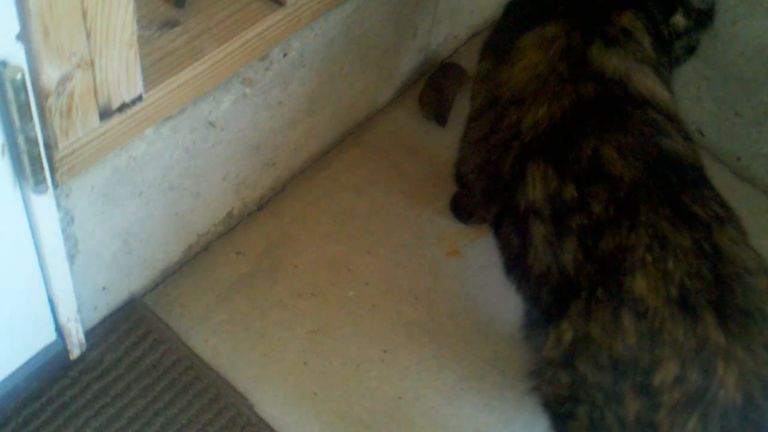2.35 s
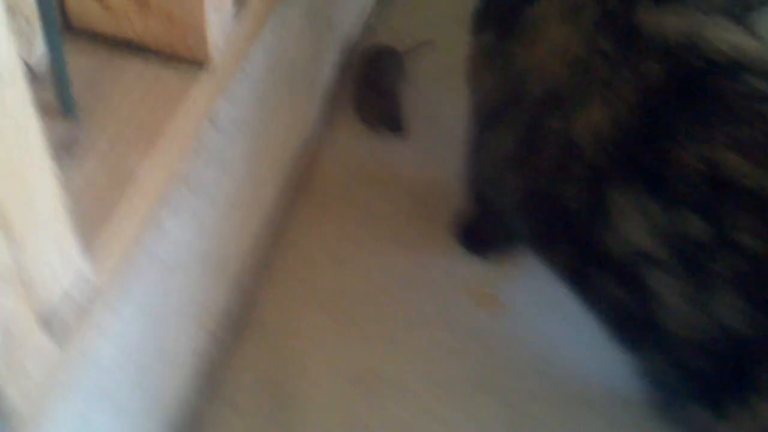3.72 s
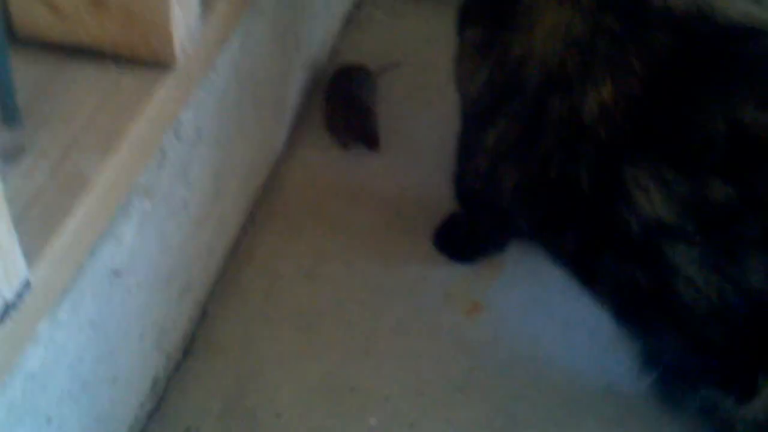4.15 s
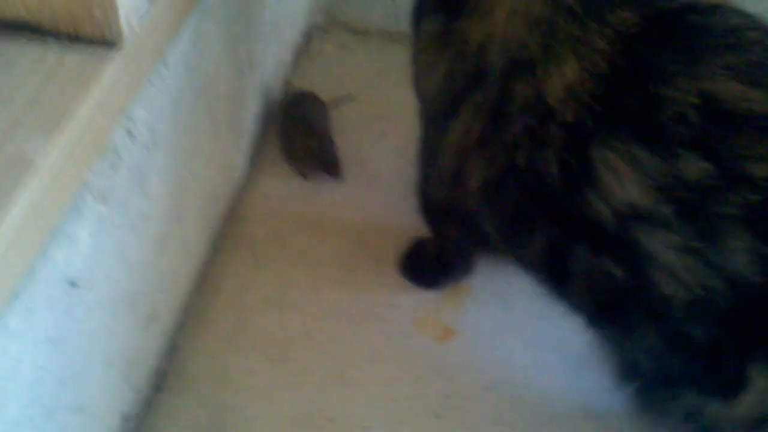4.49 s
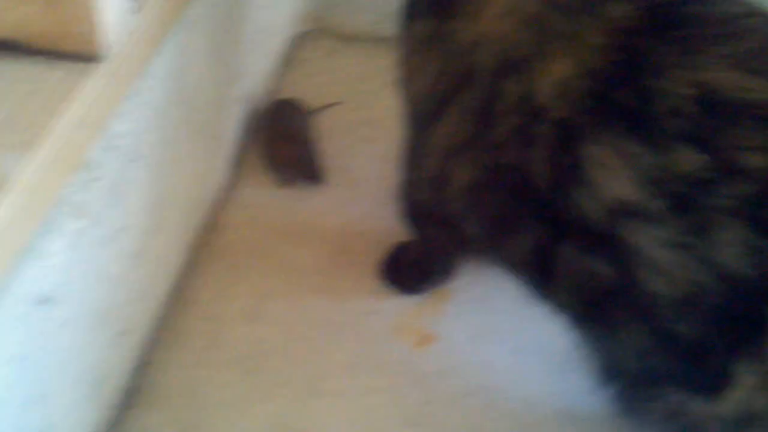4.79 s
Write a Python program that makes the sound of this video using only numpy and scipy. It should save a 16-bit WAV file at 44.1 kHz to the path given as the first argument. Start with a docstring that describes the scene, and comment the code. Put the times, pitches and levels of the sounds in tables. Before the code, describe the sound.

Faint, high, raspy mouse squeaks come about once a second over steady room rumble and machine hum, with some handling noise.

```python
"""A cornered mouse in a garage

A mouse squeaks faintly seven times, half rasp and half whistle, and bare garage walls ring on.
Behind it a machine hums, the room's air rumbles and two microphones hiss. The hand holding the
camera taps its case, a sleeve brushes and ticks, and a small metal piece clinks once.
The camera widens the stereo sound."""
import sys
import numpy as np
from scipy import signal
from scipy.fft import rfft, irfft
from scipy.io import wavfile
from scipy.ndimage import uniform_filter1d

SR = 44100
rng = np.random.default_rng(int(sys.argv[2]) if len(sys.argv) > 2 else 0)


def digitize_waveform(pressure):
    """Quantize a signal to 16-bit integers and store it at the path in sys.argv[1].

    Rows of a 2-D input are taken as channels; values are limited to [-1, 1].
    """
    field = np.atleast_2d(pressure).T
    bounded = np.clip(field, -1, 1)
    quanta = np.round(bounded * 32767).astype(np.int16)
    wavfile.write(sys.argv[1], SR, quanta)


N = 307244
TIME = np.arange(N) / SR

# Room air and microphone hiss. Each row: frequency in Hz, level in dB of the part that is alike in
# both microphones, level in dB of the part that is opposite in them.
AIR_SPECTRUM = [(31.6, -60, -42.5), (64, -43, -52), (99, -36.5, -40.5), (180, -31, -44.5),
                (249, -33.5, -44.5), (494, -41.5, -49), (606, -49, -52.5), (798, -48.5, -55),
                (1550, -61, -57), (2260, -66, -64.5), (3300, -68.5, -69), (5750, -72, -73),
                (7900, -67.5, -70), (13500, -68, -70.5)]
# The machine's hum, louder as the camera nears the corner. Each row: time in seconds, level in dB.
HUM_LEVELS = [(0, -70), (.85, -56), (1.08, -51.5), (3.5, -50), (4.25, -47), (5.6, -48.5), (6.97, -48.5)]
# Its weaker, higher whine. Each row: time in seconds, level in dB.
WHINE_LEVELS = [(0, -85.5), (3, -69), (4, -68), (4.6, -73), (6.97, -75)]
# Sleeve strokes. Each row: start in seconds, length in seconds, hiss level in dB, scrape level in dB,
# swell (small is abrupt, large is gradual), hiss brightness in dB per octave, scrape pitch factor.
SLEEVE_STROKES = [(0.584, 0.24, -62.5, -62, 0.35, -1.5, 1.2), (.68, 0.076, -56.5, -65, .7, 7, 3.1),
                  (0.94, 0.062, -59, -61.5, 0.78, -5, 1.3), (1.14, 0.13, -59.5, -63, 0.64, 0, 1.3),
                  (1.36, 0.1, -59.5, -59.5, 0.88, -3, 0.93), (1.42, .1, -56, -64, 0.94, -.5, 1.1),
                  (1.651, 0.038, -57, -65, .5, 4, 1.1), (1.659, 0.36, -69, -61.5, 0.81, 0, 0.82),
                  (2.48, 0.24, -68.5, -61.5, 0.84, -3, 0.54), (2.84, 0.17, -61, -60.5, 0.66, -3, 1.6),
                  (2.989, 0.17, -67.5, -64.5, 0.51, -6, 1.4), (3.355, 0.14, -69, -58.5, 1.1, -7, 0.72),
                  (3.52, 0.5, -67, -61.5, 0.68, -2.5, .9), (3.718, 0.032, -63, -55, 0.32, -2, 1.3),
                  (3.87, 0.99, -62, -68, 0.37, -2, 1.5), (4.198, 0.072, -51.5, -56, 0.32, 1, 1.2),
                  (4.485, 0.035, -46, -56, 0.59, 2.5, 1.56), (4.381, 0.99, -70, -68, 1.1, 1, .8)]
# The hiss of the cloth fibres. Each row: frequency in Hz, level in dB.
FIBRE_SPECTRUM = [(1000, -35), (2400, -22), (3500, -5), (4800, -4), (7000, 1), (9000, 2), (11500, 2.5),
                  (14000, -1)]
# Cloth scraping on the case. Each row: frequency in Hz, level in dB.
SCRAPE_SPECTRUM = [(300, 6.5), (850, 3), (1200, 3.5), (1700, -0.5), (2300, -4.5), (3400, -8), (5000, -10.5),
                   (10000, -20)]
# Finger taps beside the right microphone. Each row: start in seconds, peak level in dB,
# pitch factor of the spot that is hit, ring time factor.
FINGER_TAPS = [(.004, -4.5, 1.043, 1.56), (0.657, -40, 0.9, 5.5), (3.136, -38.5, 0.92, 0.84),
               (3.31, -44, 1.3, 1), (3.614, -33.5, 0.72, 0.7), (3.728, -44, 1.4, 2),
               (3.738, -38.5, 1.55, 1.6), (4.276, -41, 0.29, 2.2), (4.4888, -37, 0.49, 2.34),
               (5.097, -40.5, 1.15, 1.2), (5.0989, -36.5, 0.53, 0.98), (5.2954, -45, 1.2, 0.88),
               (5.2965, -35.5, 0.34, 2.5)]
# The case's own tones, before each tap scales them. Each row: frequency in Hz, level in dB,
# ring time in seconds. A ring time is how long a sound takes to fade by 60 dB.
CASE_TONES = [(953, -0.5, 0.0052), (630, 3.5, 0.003), (307, -7.5, 0.0071)]
# Dry ticks. Each row: start in seconds, peak level in dB, brightness in dB per octave,
# ring time in seconds, pitch factor.
DRY_TICKS = [(.598, -45.5, -15, 0.0085, 0.85), (1.649, -33.5, -1.5, 0.0097, 1.2), (3.93, -37, -6, .014, 1),
             (3.9395, -38.5, -5, 0.03, 1.1), (3.962, -44, -5, 0.017, 1.04), (4.279, -42, -6.5, 0.023, 1.4),
             (6.355, -52, -13, .015, 0.89)]
# The tone colour that the ticks share. Each row: frequency in Hz, level in dB.
TICK_SPECTRUM = [(500, -30), (1500, -20), (2300, 3.5), (3000, 3), (4200, -6), (7000, 8), (10000, 8.5),
                 (14000, 10)]
# The metal piece's tones. Each row: frequency in Hz, level in dB, ring time in seconds.
METAL_TONES = [(7600, -54, 0.15), (12920, -55, .09)]
# The garage's echo. Each row: frequency in Hz, ring time in seconds.
GARAGE_RING_TIMES = [(2500, 0.75), (5000, 0.56)]
# Clear notes within the squeaks, at times two at once. Each row: start in seconds, length in seconds,
# level in dB, middle pitch in Hz, pitch glide in Hz.
WHISTLE_NOTES = [(.09, .055, -65, 3770, 120), (.095, 0.099, -68, 4230, 0), (.133, .04, -68, 2960, 0),
                 (.138, .032, -63, 3430, 78), (1.042, .038, -59.5, 4110, 140), (1.059, .036, -56, 4490, 0),
                 (1.092, 0.1, -67, 3040, 0), (1.803, 0.058, -63.5, 3920, -120),
                 (1.853, .047, -64, 3240, 30), (1.908, .05, -65, 3190, -30), (2.807, 0.042, -68, 3530, 130),
                 (3.985, .023, -69, 4060, 50), (4.017, 0.036, -66, 3570, 2),
                 (5.113, .074, -73.5, 3600, -58), (5.79, .025, -65, 3590, 100),
                 (5.846, .048, -67.5, 3290, 80)]
# Breath shaped by the mouse's mouth. Each row: frequency in Hz, level in dB.
BREATH_SPECTRUM = [(1500, -40), (2600, -25), (3100, -1), (3700, 2), (4500, 1), (5000, -8), (8000, -36)]
# The hoarse squeaks. Each row: start in seconds, length in seconds, level in dB, top pitch in Hz,
# final pitch in Hz, rasp as a share of the pitch, share of the length at which the voice breaks
# downward, level of the final note in dB compared with the first.
HOARSE_SQUEAKS = [(0.072, 0.12, -66, 3800, 3490, 0.066, 0.57, -2),
                  (1.015, .15, -60.5, 4166, 3150, 0.075, 0.53, -9),
                  (1.779, 0.18, -60.5, 3990, 3150, 0.095, 0.7, -7),
                  (2.758, 0.11, -66, 3680, 3520, 0.076, 0.86, -3.5),
                  (3.963, 0.1045, -64.5, 3700, 3460, 0.078, 0.545, -3),
                  (5.095, 0.1, -70.5, 3670, 3560, .08, 0.72, 2),
                  (5.735, .175, -66.5, 3960, 3235, .135, 0.47, -3)]
# Stereo widening. Each row: frequency in Hz, share of the other channel that is subtracted.
WIDENING_SHARES = [(100, 0.77), (2400, 1), (2850, 1), (3900, 0.63), (5200, 0.35), (8000, 0.25),
                   (13000, 0.35)]


def amp(db):
    """Turns decibels into a factor to multiply by."""
    return 10 ** (np.asarray(db) / 20)


def unit(x):
    """Scales a signal to an average size (rms) of one."""
    return x / np.sqrt(np.mean(x ** 2) + 1e-20)


def read(points, hz, column=1):
    """Looks up frequencies in a table, blending between rows on a logarithmic frequency scale."""
    table = np.transpose(points)
    return np.interp(np.log(hz + 1), np.log(table[0] + 1), table[column])


def add(mix, start_s, sound):
    """Adds a sound to the mix at the given time."""
    part = mix[..., max(round(start_s * SR), 0):][..., :sound.shape[-1]]
    part += sound[..., :part.shape[-1]]


def noise(points, column=1, size=N, pitch=1):
    """Noise coloured by a spectrum table, which the pitch factor shifts up or down."""
    gain = amp(read(points, np.fft.rfftfreq(size, 1 / SR) / pitch, column))
    return irfft(rfft(rng.standard_normal(size)) * gain, size)


def wander(hz):
    """A random drift of average size one, mostly slower than the given rate."""
    keep_slow = 1 / (1 + (np.fft.rfftfreq(N, 1 / SR) / hz) ** 4)
    return unit(irfft(rfft(rng.standard_normal(N)) * keep_slow, N))


def tilted(points, db_per_octave):
    """Makes a spectrum table brighter or duller."""
    return [(hz, level + db_per_octave * np.log2(hz)) for hz, level in points]


def mottled(x, patch_db):
    """Keeps shifting a sound's colour with random patches about 1 kHz wide and 25 ms long."""
    spectra = signal.stft(x, nperseg=256)[2]
    specks = rng.standard_normal(spectra.shape[-2:])
    patches = uniform_filter1d(uniform_filter1d(specks, size=6, axis=0), size=8, axis=1)
    return signal.istft(spectra * amp(patch_db * unit(patches)), nperseg=256)[1][..., :N]


def air(swell_db=0.65, bass_hz=130, bass_db_per_hum_db=0.2):
    """The room rumbles and the microphones hiss; the bass builds with the hum toward the corner."""
    alike, opposite = noise(AIR_SPECTRUM, column=1), noise(AIR_SPECTRUM, column=2)
    pair = np.array([alike + opposite, alike - opposite]) * amp(swell_db * wander(hz=9.8))
    bass = signal.sosfiltfilt(signal.butter(3, bass_hz, fs=SR, output="sos"), pair)
    hum_db = np.interp(TIME, *np.transpose(HUM_LEVELS))
    bass_gain = amp(bass_db_per_hum_db * (hum_db - hum_db.mean()))
    return pair + bass * (bass_gain - 1)


def machine(hum_hz=197.2, whine_hz=582, waver_db=1.0, drift=0.0026, lag_radians=0.022):
    """A machine gives off two wavering tones that reach the microphones slightly out of step."""
    out = np.zeros((2, N))
    for hz, levels in ((hum_hz, HUM_LEVELS), (whine_hz, WHINE_LEVELS)):
        phase = 2 * np.pi * np.cumsum(hz * (1 + drift * wander(hz=3.6))) / SR
        loudness = amp(np.interp(TIME, *np.transpose(levels)) + waver_db * wander(hz=4.4))
        out += loudness * np.sqrt(2) * np.sin([phase, phase - lag_radians])
    return out


def sleeve(hardest_at=0.41, grain_db=0.6, grain_hz=400, drag_db=1.14, drag_hz=45):
    """Cloth rubs the case: each fold has its own colour, and catching fibres make it grainy."""
    out, t = np.zeros((2, N)), np.arange(SR) / SR
    for start, length, hiss_db, scrape_db, swell, brightness, pitch in SLEEVE_STROKES:
        pressure = np.interp(t / length, [0, hardest_at, 1], [0, 1, 0]) ** swell
        for channel in out:
            hiss = unit(noise(tilted(FIBRE_SPECTRUM, brightness), size=SR))
            scrape = unit(noise(SCRAPE_SPECTRUM, size=SR, pitch=pitch))
            add(channel, start, pressure * (amp(hiss_db) * hiss + amp(scrape_db) * scrape))
    rubbing = mottled(out, patch_db=1.5)
    catching_db = grain_db * wander(grain_hz) + drag_db * wander(drag_hz)
    return rubbing * unit(amp(catching_db))


def taps(contact_s=0.00093, left_db=-22, low_cut_hz=110):
    """A soft fingertip makes the case ring: higher on a stiff spot, longer where the hand damps less."""
    t, out = np.arange(SR // 20) / SR, np.zeros(N)
    low_cut = signal.butter(1, low_cut_hz, "high", fs=SR)  # the microphone's opening leaks slow pressure
    for start, peak_db, pitch, ring_factor in FINGER_TAPS:
        ring = sum(amp(db - 60 * t / (ring_s * ring_factor)) * np.cos(2 * np.pi * hz * pitch * t)
                   for hz, db, ring_s in CASE_TONES)
        push = np.sin(np.pi * np.minimum(t * pitch / contact_s, 1)) ** 2  # shorter on a stiff spot
        knock = signal.lfilter(*low_cut, signal.fftconvolve(ring, push)[:len(t)])
        add(out, start, amp(peak_db) * knock / abs(knock).max())
    return out * amp([[left_db], [0]])


def ticks():
    """Cloth and case give tiny snaps, each a short burst of noise with its own colour."""
    t, out = np.arange(2048) / SR, np.zeros((2, N))
    for start, peak_db, brightness, ring_s, pitch in DRY_TICKS:
        colour = tilted(TICK_SPECTRUM, brightness)
        burst = np.array([noise(colour, size=len(t), pitch=pitch) for channel in out])
        burst *= amp(-60 * t / ring_s)
        add(out, start, amp(peak_db) * burst / abs(burst).max())
    return out


def clink(start_s=1.667, right_db=-4):
    """A small piece of metal rings briefly with two high tones."""
    t, out = np.arange(SR // 3) / SR, np.zeros((2, N))
    sides = np.array([[1], [-amp(right_db)]])  # the right wave is weaker and upside down
    for hz, db, ring_s in METAL_TONES:
        add(out, start_s, amp(db - 60 * t / ring_s) * np.sin(2 * np.pi * hz * t) * sides)
    return out


def garage(sound, direct_db=-6.5, echo_db=-6, early_db=6, early_s=0.039):
    """The corner throws back a dense bunch of early echoes, then the bare walls ring on."""
    hz, t, spectra = signal.stft(rng.standard_normal((2, SR // 2)), SR, nperseg=256)
    decay = amp(-60 * t / read(GARAGE_RING_TIMES, hz)[:, None] + early_db * np.exp(-t / early_s))
    tail = signal.istft(spectra * decay, SR, nperseg=256)[1]
    echo = signal.fftconvolve(sound[None], tail / np.linalg.norm(tail[0]), axes=1)[:, :N]
    return amp(direct_db) * sound + amp(echo_db) * echo


def mouse_whistles(waver=0.0092, waver_hz=160, flutter_db=2, flutter_hz=90):
    """The mouse's voice catches on a nearly pure note, holds it for a moment and jumps off again."""
    out = np.zeros(N)
    drift, flutter = 1 + waver * wander(waver_hz), flutter_db * wander(flutter_hz)
    for start, length, level_db, hz, glide_hz in WHISTLE_NOTES:
        span = np.arange(int(start * SR), int((start + length) * SR))
        pitch = (hz + glide_hz * np.linspace(-.5, .5, len(span))) * drift[span]
        loudness = amp(level_db + flutter[span]) * signal.windows.tukey(len(span), .6)
        out[span] += loudness * np.sin(2 * np.pi * np.cumsum(pitch) / SR)
    return out


def mouse_squeaks(breath_db=-9, jitter_limit=1.87, tremble_db=3, hoarse_db=-3, onset_db=-8, fade_db=-1,
                  start_pitch_share=.93, top_at=.64, break_length_s=.03, final_rasp_share=.55):
    """A hoarse whistle climbs, then breaks down to a lower, clearer note, over a rush of breath."""
    out = np.zeros(N)
    breath = amp(breath_db) * unit(noise(BREATH_SPECTRUM))
    jitter = jitter_limit * np.tanh(wander(hz=420) / jitter_limit)  # fast pitch shakes make the rasp
    tremble = tremble_db * wander(hz=70)
    # Complex noise shakes both the strength and the timing of the wave.
    turbulence = amp(hoarse_db) * (wander(hz=480) + 1j * wander(hz=480)) / np.sqrt(2)
    for start, length, level_db, top_hz, final_hz, rasp, break_at, final_db in HOARSE_SQUEAKS:
        span = np.arange(int(start * SR), int((start + length) * SR))
        t, break_s = TIME[span] - start, break_at * length
        # Four moments shape a squeak: its start, its top, the landing on the final note, its end.
        moments = np.sort([0, top_at * break_s, break_s + break_length_s / 2, length])
        pitch = np.interp(t, moments, [start_pitch_share * top_hz, top_hz, final_hz, final_hz])
        effort_db = level_db + np.interp(t, moments, [onset_db, 0, final_db, final_db + fade_db])
        roughness = np.interp(t, [break_s, break_s + break_length_s], [1, final_rasp_share])
        hz = pitch * (1 + rasp * roughness * jitter[span])
        tone = np.exp(2j * np.pi * np.cumsum(hz) / SR)
        voice = ((1 + np.sqrt(roughness) * turbulence[span]) * tone).real
        out[span] += amp(effort_db + tremble[span]) * signal.windows.tukey(len(span), .12) * voice
        out[span] += amp(level_db) * signal.windows.tukey(len(span), .6) * breath[span]
    return out


def scene():
    """Everything as it reaches the two microphones; only the mouse gets the garage's echo."""
    mouse = garage(mouse_squeaks() + mouse_whistles())
    return air() + machine() + sleeve() + taps() + ticks() + clink() + mouse


def record(dry, left_db=-1.22, delay_samples=17, high_cut_hz=14000):
    """The camera widens each side by subtracting a late, dull copy of the other, then cuts the top."""
    hz = np.fft.rfftfreq(N + SR, 1 / SR)
    spectrum = rfft(dry * amp([[left_db], [0]]), N + SR)
    delay = np.exp(-2j * np.pi * hz * delay_samples / SR)
    other_side = read(WIDENING_SHARES, hz) * delay * spectrum[::-1]
    wide = irfft(spectrum - other_side, N + SR)[:, :N]
    high_cut = signal.firwin(511, high_cut_hz, window=("kaiser", 9), fs=SR)
    return signal.oaconvolve(wide, high_cut[None], "same")


dry = scene()
out = record(dry)
digitize_waveform(out)
```